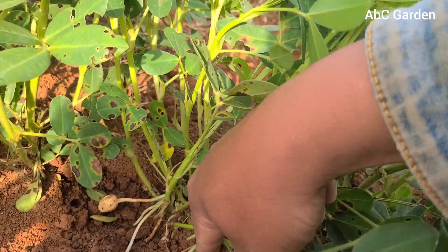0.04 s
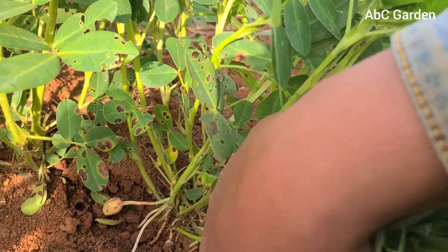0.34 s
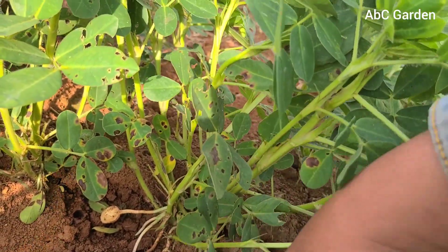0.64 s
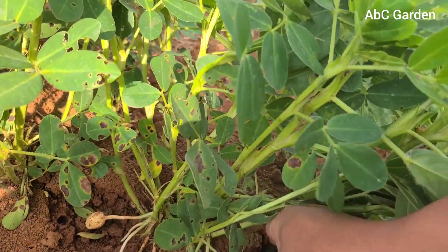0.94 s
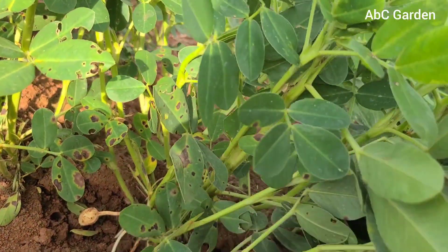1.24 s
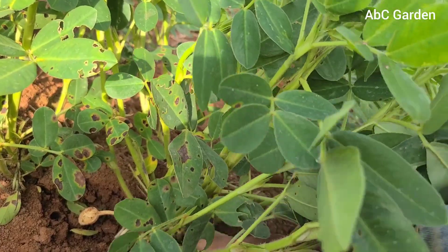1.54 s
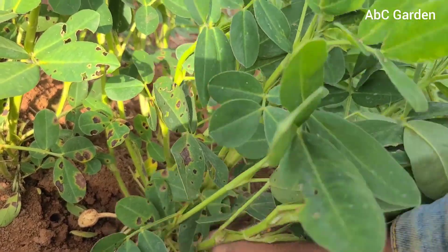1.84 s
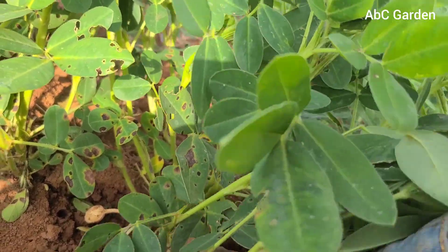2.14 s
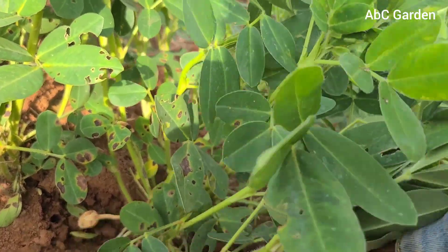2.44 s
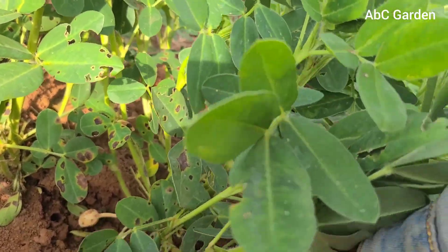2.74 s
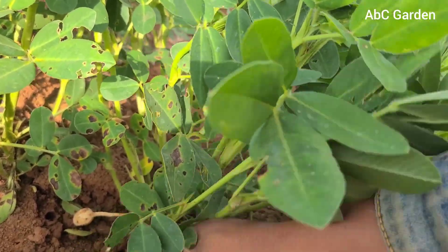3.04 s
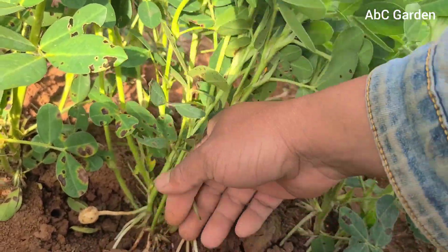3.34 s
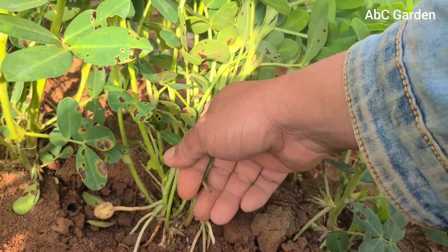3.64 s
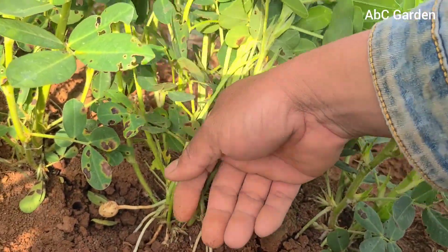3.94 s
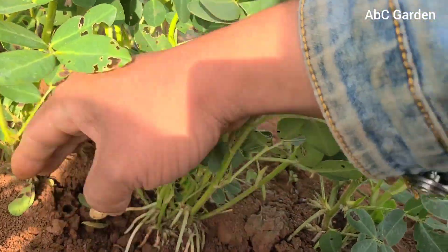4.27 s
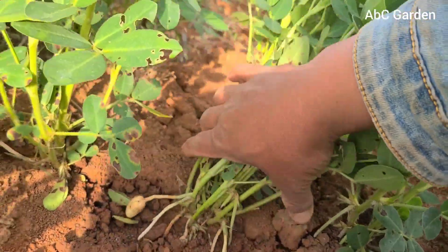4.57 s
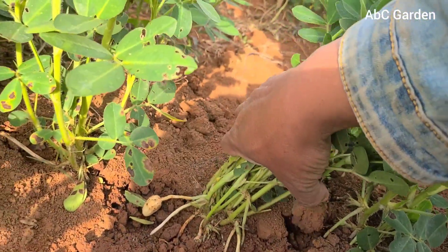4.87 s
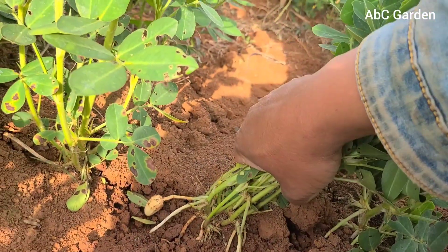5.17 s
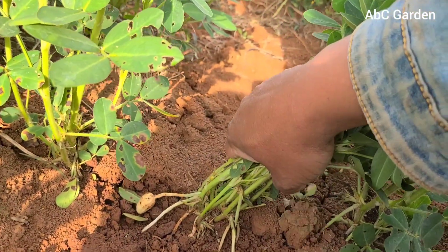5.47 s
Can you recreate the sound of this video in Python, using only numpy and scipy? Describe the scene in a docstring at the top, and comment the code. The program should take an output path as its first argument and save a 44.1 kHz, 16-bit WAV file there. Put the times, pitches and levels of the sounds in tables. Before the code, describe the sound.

Two far-off engines drone under the close, irregular rustle of a hand pulling at a plant in a garden. Cloth brushes by first and dry earth crunches, then leaves crinkle, a stalk snaps and the stems bump softly on the ground. After a short pause the scraping and snapping resume, while one engine throttles back and fades.

```python
"""A hand works into a leafy plant close to the microphones and drags its stems over dry soil.
First a sleeve brushes past and clods crunch; far off, one engine idles and another runs steadily.
Each stroke is a mass of tiny slips: ground scuffs, stems rasp, leaves sizzle. Around 2 s a leaf edge
crinkles, a stalk snaps and the gathered stems bump the ground. The hand rests near 3.8 s, then drags on
through more snaps and crunches while the running engine throttles back."""
import sys
import numpy as np
from scipy import signal
from scipy.fft import rfft, irfft, next_fast_len
from scipy.io import wavfile
from scipy.ndimage import uniform_filter1d

SR = 44100
rng = np.random.default_rng(int(sys.argv[2]) if len(sys.argv) > 2 else 0)


def wav_out(sig):
    """Save sig, one row per channel (or a flat mono array), as 16-bit PCM at SR to the path in sys.argv[1]."""
    wavfile.write(sys.argv[1], SR, np.round(np.clip(np.atleast_2d(sig).T, -1, 1) * 32767).astype(np.int16))


N = 247401


# hand strokes: peak_s, rise_s, fall_s, rasp_db, scuff_re_rasp_db, sizzle_re_rasp_db, left_right_db
STROKES = [(0.119, 0.0089, 0.023, -50.5, 8, 1.5, -4), (0.2, 0.024, 0.011, -64, 10, 1, -1),
           (0.342, 0.034, 0.018, -58, -9, 3, -4), (0.45, 0.066, 0.037, -77, 17, 17.5, -2),
           (0.77, 0.049, 0.021, -53.5, 7, 1, -1.5), (1.11, 0.049, 0.075, -57, 4.5, -12, 1),
           (1.17, 0.046, 0.031, -54, -2, 3.5, 1), (1.24, 0.033, 0.046, -54.5, 5.5, 1, 1),
           (1.53, 0.027, 0.044, -58.5, -1.5, -11, 0), (1.796, 0.027, 0.031, -50.5, -0.5, -1.5, 1),
           (1.895, 0.026, 0.044, -59, -5, 3.5, 1), (1.997, 0.024, 0.017, -56.5, -5, -5, 0),
           (2.17, 0.054, 0.028, -58.5, 2.5, -16, -1), (2.288, 0.0064, 0.053, -54, 0, -1.5, 1.5),
           (2.46, 0.13, 0.075, -63, -5, 2.5, 2), (2.86, 0.097, 0.045, -59.5, 2.5, -9, 1),
           (3.15, 0.079, 0.087, -58, 2.5, -4.5, 2.5), (3.34, 0.12, 0.08, -64.5, 6.5, 1, 2),
           (3.577, 0.042, 0.021, -53.5, 1, -4.5, .5), (3.94, 0.041, 0.03, -64, 6.5, -15, 1),
           (4.42, 0.087, 0.19, -59, 5, 3, 1.5), (4.8, 0.053, 0.089, -64, 8, -3, 0),
           (4.985, .02, 0.06, -64, 4.5, -1, -4), (5.38, .02, 0.023, -64.5, -7, -5, -1)]
# stirring between strokes: time_s, rasp_db
STIR = [(0, -68), (0.57, -68.5), (0.86, -63), (0.97, -69), (1.36, -64), (1.45, -70), (1.95, -67),
        (2.35, -70.5), (2.68, -73.5), (3.3, -67), (3.5, -76), (3.68, -79.5), (3.86, -81), (4.0, -64.5),
        (4.65, -68.5), (5.05, -66.5), (5.28, -76), (5.61, -78.5)]
STIR_SCUFF_DB, STIR_SIZZLE_DB = 4, 0  # re rasp

def handling():
    """Stereo gains of scuff, rasp and sizzle; stirring and strokes add in power."""
    stir = amp(follow(STIR)[0])
    power = (amp([STIR_SCUFF_DB, 0, STIR_SIZZLE_DB])[:, None, None] * stir) ** 2
    for peak_s, rise_s, fall_s, rasp_db, scuff_db, sizzle_db, lean_db in STROKES:
        shares = amp([scuff_db, 0, sizzle_db])[:, None, None] * pan(lean_db)
        power = power + (shares * swell(peak_s, rise_s, fall_s, rasp_db)) ** 2
    return np.sqrt(power)


# spectra of scuffed ground, rasping stems, leaf on leaf: freq_hz, gain_db
SCUFF = [(100, -12.5), (250, 1), (500, -3.5), (780, 1.5), (950, -0.5), (1300, 3.5), (1600, -4.5),
         (1950, -3.5), (2350, -11.5), (4000, -17), (16000, -40)]
RASP = [(700, -19), (1800, -11), (2500, -0.5), (3100, -0.5), (3800, -2), (4700, -2.5), (5400, -8),
        (6300, -7), (7500, -17), (9200, -8.5), (16000, -30.5)]
SIZZLE = [(1000, -24), (4000, -14.5), (6200, -6.5), (7600, -7.5), (9000, -1.5), (11000, -3), (13000, -3.5),
          (15500, -8), (16500, -4.5)]

def foliage():
    """The hand scuffs the ground coarsely, stems rasp, leaf blades slide with a fine grain."""
    scuff_gain, rasp_gain, sizzle_gain = handling()
    scuff = friction(slips_per_s=800, spread_db=3.2, grain_s=0.001, floor=0.6, clump_db=0.9)
    rasp = friction(slips_per_s=900, spread_db=3.1, grain_s=0.0007, floor=1, clump_db=0.9)
    sizzle = friction(slips_per_s=900, spread_db=3.4, grain_s=0.0005, floor=0.9, clump_db=1.1)
    scuff = colour(patches(scuff, depth_db=2, width_bins=3, length_frames=10), SCUFF)
    rasp = colour(patches(rasp, depth_db=2, width_bins=4, length_frames=15), RASP)
    sizzle = colour(patches(sizzle, depth_db=1.5, width_bins=7, length_frames=10), SIZZLE)
    return scuff_gain * pan(-3.5) * scuff + rasp_gain * pan(-0.7) * rasp + sizzle_gain * pan(2) * sizzle


# stem on stem: start_s, level_db, pitch_hz
SCRATCHES = [(0.2127, -55, 3070), (0.76, -45.5, 4760), (0.891, -51.5, 3930), (1.791, -66, 2820),
             (2.293, -52, 4400), (2.4901, -55, 3300), (4.098, -54, 2760), (4.204, -57.5, 6000),
             (4.775, -55, 3420)]
# leaves flicking free: start_s, level_db
FLICKS = [(1.1674, -44.5), (1.786, -42.5), (1.8132, -42.5), (1.9884, -49), (1.998, -49), (2.532, -52.5),
          (2.845, -54.5), (3.5236, -53.5)]
# stalks and rootlets snapping: start_s, level_db, left_right_db
SNAPS = [(2.0327, -35, 5), (3.6565, -39.5, 4), (4.6244, -42, 5), (5.1392, -55, 0.5), (5.213, -47, 3),
         (5.4824, -52, 0.5), (5.505, -41.5, 2.0), (5.5528, -52, -2.5), (5.591, -48, -1.0)]
# snap spectrum: freq_hz, gain_db
SNAP_SPECTRUM = [(1000, -30), (4000, -8), (6000, -5), (8000, -7), (11000, 0), (14500, -10), (16500, 8)]

def catches():
    """Stems and leaves catch on each other and slip free; fine stalks break."""
    out = np.zeros((2, N))
    for start_s, db, hz in SCRATCHES:
        resonance = [(hz / 4, -24), (hz * 0.85, -8), (hz, 0), (hz * 1.08, -7), (hz * 1.9, -22)]
        scratch = colour(burst(rise_s=0.00032, decay_s=0.0068), resonance)
        add(out, start_s, amp(db) * scratch)
    for start_s, db in FLICKS:
        flick = colour(burst(rise_s=0.001, decay_s=0.0069), SIZZLE, tilt_db_per_oct=4)
        add(out, start_s, amp(db) * pan(6) * flick)
    for start_s, db, lean_db in SNAPS:
        snap = colour(burst(rise_s=0.0001, decay_s=0.0023), SNAP_SPECTRUM)
        add(out, start_s, amp(db) * pan(lean_db) * snap)
    return out


# crunches under the fingers: start_s, level_db, left_right_db, tilt_db_per_oct
CLODS = [(0.104, -41.5, -8, -1), (0.118, -36, -3, 2.5), (0.141, -46, -2, 7), (0.447, -47, -12, -3),
         (0.595, -51, -5, 2.5), (0.764, -39, 3, -3.5), (1.213, -41.5, 5, -6.5), (4.308, -52.5, -1, 4.5),
         (4.345, -54, -1, -5), (4.397, -49, 10, -1), (4.746, -45, -4, 1), (4.754, -46, -8, -0.5),
         (4.978, -52, 1, 2), (5.166, -50.5, -3, 3.5), (5.592, -48.5, 2, 3)]
# crunch spectrum: freq_hz, gain_db
CLOD_SPECTRUM = [(100, -2.5), (300, 2), (550, 8.5), (780, 5), (1000, -1.5), (1350, 1.5), (2000, -4.5),
                 (2500, -12.5), (3700, -14), (7000, -27), (16000, -43)]

def clods():
    """A dry clod gives way with one crack, then crumbles."""
    out = np.zeros((2, N))
    for start_s, db, lean_db, tilt in CLODS:
        crumble = burst(rise_s=0.0005, decay_s=0.0052)
        crack = 2 * signal.unit_impulse(crumble.shape[1], 25)
        add(out, start_s, amp(db) * pan(lean_db) * colour(crack + crumble, CLOD_SPECTRUM, tilt))
    return out


# bundle bumps: start_s, level_db
BUMPS = [(2.246, -52.5), (2.253, -45.5), (2.28, -48)]
# bundle modes: freq_hz, gain_db, t60_s
BUNDLE_MODES = [(422, 5.5, 0.022), (617, 3.5, 0.053), (760, -29, 0.03)]

def stem_bundle():
    """The gathered stems bump the ground and ring hollow."""
    out = np.zeros((2, N))
    t = np.arange(6000) / SR
    ring = sum(amp(db - 60 * t / t60_s) * np.sin(2 * np.pi * hz * t) for hz, db, t60_s in BUNDLE_MODES)
    for start_s, db in BUMPS:
        add(out, start_s, amp(db) * pan(-3.5) * ring)
    return out


# leaf-edge crinkles: peak_s, rise_s, fall_s, level_db
CRINKLES = [(1.805, 0.02, 0.017, -49), (1.9, .02, 0.06, -57.5), (2.002, 0.013, .012, -48.5),
            (2.032, .01, .016, -53), (2.46, 0.056, 0.074, -59)]
# crinkle spectrum: freq_hz, gain_db
CRINKLE_SPECTRUM = [(3000, -30), (8000, -38), (10000, -1), (12500, 5), (15500, 3), (16500, -12)]

def leaf_edge():
    """A leaf edge crinkles in sharp little slips beside the left microphone."""
    slips = friction(slips_per_s=500, spread_db=3.6, grain_s=0.0005, floor=0.15, clump_db=1.2)
    crinkle = colour(patches(slips, depth_db=1.5, width_bins=7, length_frames=6), CRINKLE_SPECTRUM)
    return sum(swell(*row) for row in CRINKLES) * pan(8) * crinkle


# sleeve drags: peak_s, rise_s, fall_s, level_db
DRAGS = [(0.12, 0.0061, .01, -54), (0.2, 0.029, .03, -62), (0.3, 0.062, 0.09, -55.5)]
# cloth spectrum: freq_hz, gain_db
CLOTH_SPECTRUM = [(400, -18), (1200, -1), (1850, 8), (2300, -2), (3000, 4.5), (3700, -8), (5000, -5),
                  (8000, -35), (16000, -35)]

def sleeve():
    """Cloth drags over stems on the right."""
    slips = friction(slips_per_s=1200, spread_db=2.5, grain_s=0.0006, floor=0.5, clump_db=0.6)
    return sum(swell(*row) for row in DRAGS) * pan(-10) * colour(slips, CLOTH_SPECTRUM)


# engine speed: time_s, firing_hz
SPEED = [(0, 57.5), (0.85, 57.7), (1.9, 59.3), (3.5, 60.1), (4.05, 59.4), (4.27, 55.5), (5.1, 50.5),
         (5.6, 46.6)]
# firing tone: time_s, level_db
THROB = [(0, -45), (0.5, -49), (0.75, -42), (1, -52.5), (1.25, -40.5), (1.5, -43), (1.9, -37),
         (2.35, -47.5), (2.75, -36.5), (3.15, -45), (4.12, -36.5), (4.2, -60), (4.8, -60)]
# engine load, drives overtones and gas: time_s, gain_db
LOAD = [(0, -1), (0.8, 1.5), (1.5, 3), (2.3, 0), (3.7, -1.5), (4.4, -4), (5.6, -12)]
# exhaust overtones: firing_multiple, level_db
EXHAUST = [(3, -66), (4, -67.5), (5, -74.5), (6, -75.5), (7, -80.5), (8, -73), (9, -74), (10, -75.5)]
# gas noise spectrum: freq_hz, gain_db
GAS_SPECTRUM = [(100, -10), (200, 0), (330, 0.5), (520, 2), (640, -4.5), (900, -16), (3000, -36),
                (16000, -68)]
OCTAVE_DB, GAS_DB = -49.5, -61  # at 0 dB load
ENGINES_LEAN_DB = -2.03

def running_engine():
    """A distant exhaust: only the low orders and a soft flutter of gas carry this far."""
    (firing_hz,), (firing_db,), (load_db,) = follow(SPEED), follow(THROB), follow(LOAD)
    cycles = np.cumsum(firing_hz) / SR + 0.0086 * drift(rate_hz=7)
    firing = amp(firing_db) * tone(cycles)
    octave = amp(OCTAVE_DB + 1.62 * load_db) * tone(2 * cycles)
    overtones = sum(amp(db + load_db + 3.1 * drift(rate_hz=1.45)) * tone(k * cycles) for k, db in EXHAUST)
    puffs = noise(N) * (1 + 0.37 * tone(cycles))
    gas = amp(GAS_DB + load_db) * unit(colour(puffs, GAS_SPECTRUM))
    return (firing + octave + overtones) * pan(ENGINES_LEAN_DB) + gas


# idle harmonics: beat_multiple, level_db
IDLE_HARMONICS = [(2, -71), (3, -70), (4, -53), (5, -49.5), (6, -49.5), (7, -69), (8, -65.5)]
IDLE_BEAT_HZ = 12.13

def idling_engine():
    """A second distant exhaust hums on wavering harmonics of its slow beat."""
    cycles = IDLE_BEAT_HZ * np.arange(N) / SR + 0.005 * drift(rate_hz=0.59)
    hum = sum(amp(db) * tone(k * cycles) for k, db in IDLE_HARMONICS)
    return amp(drift(rate_hz=3.3) - 2.5) * pan(ENGINES_LEAN_DB) * hum


# open-air spectrum: freq_hz, gain_db
AIR_SPECTRUM = [(20, -25.5), (45, 5.5), (70, 5.5), (110, 0), (200, -9), (480, -18), (850, -30.5),
                (1300, -23.5), (2200, -30.5), (3300, -30), (7500, -53.5), (9000, -63), (16000, -48)]
AIR_DB = -50

def air():
    """Outdoor rumble with a faint hiss."""
    return amp(AIR_DB + 0.23 * drift(rate_hz=3.9)) * unit(colour(noise(N), AIR_SPECTRUM))


# microphone likeness: freq_hz, correlation (clipped to 1)
MIC_LIKENESS = [(60, 1.3), (110, 0.5), (200, 0.9), (380, 0.57), (700, 0.15), (1290, 0.24), (2400, -0.02),
                (15000, 0.0)]
# microphone balance: freq_hz, left_right_db
MIC_BALANCE = [(100, 2), (300, -0.5), (600, -3.5), (1300, 1), (2500, 1), (15000, -1)]

def noise(size):
    """White noise at two microphones: alike in the bass, unrelated in the treble."""
    padded = next_fast_len(size)
    hz = np.fft.rfftfreq(padded, 1 / SR)
    left, unrelated = rfft(rng.standard_normal((2, padded)))
    likeness = np.clip(read(MIC_LIKENESS, hz), -1, 1)
    right = likeness * left + np.sqrt(1 - likeness ** 2) * unrelated
    return irfft(np.array([left, right]) * pan(read(MIC_BALANCE, hz)), padded)[:, :size]


def friction(slips_per_s, spread_db, grain_s, floor, clump_db):
    """Tiny slips over a steady power floor, each a dying puff; a few are large, and they clump."""
    slipping = rng.random(N) < slips_per_s / SR
    slips = slipping * amp(spread_db * np.minimum(rng.exponential(1, N), 4.5))
    power = signal.lfilter([1], [1, -np.exp(-1 / (grain_s * SR))], slips ** 2)
    envelope = np.sqrt(power / power.mean() + floor)
    return unit(noise(N) * envelope * amp(clump_db * drift(rate_hz=77)))


def patches(x, depth_db, width_bins, length_frames):
    """Each leaf or stalk that takes over the rubbing has its own pitch: short patches of colour."""
    spectra = signal.stft(x, nperseg=256, noverlap=192)[2]
    field = rng.standard_normal(spectra.shape[1:])
    for _ in range(2):
        field = uniform_filter1d(field, width_bins, axis=0)
        field = uniform_filter1d(field, length_frames, axis=1)
    patchy = signal.istft(spectra * amp(depth_db * unit(field)), nperseg=256, noverlap=192)[1]
    return unit(patchy[:, :N])


def burst(rise_s, decay_s, size=6000):
    """A noise puff with the energy of its envelope scaled to peak 1."""
    t = np.arange(size) / SR
    envelope = (1 - np.exp(-t / rise_s)) * np.exp(-t / decay_s)
    return unit(noise(size) * envelope) * np.sqrt(np.mean(envelope ** 2)) / envelope.max()


def swell(peak_s, rise_s, fall_s, db):
    """Gain of one stroke: exponential rise and fall."""
    t = np.arange(N) / SR - peak_s
    away = np.maximum(-t / (rise_s + 1e-4), t / (fall_s + 1e-4))
    return amp(db) * np.exp(-np.minimum(away, 20))


def colour(x, spectrum, tilt_db_per_oct=0, size=4096):
    """Minimum-phase filter of unit energy."""
    hz = abs(np.fft.fftfreq(size, 1 / SR))
    log_gain = np.log(amp(read(spectrum, hz) + tilt_db_per_oct * np.log2(hz / 1000 + 0.1)))
    response = np.exp(np.conj(signal.hilbert(log_gain)))
    taps = np.fft.ifft(response).real[:size // 2]
    return signal.oaconvolve(x, taps[None] / np.linalg.norm(taps), axes=1)[:, :x.shape[1]]


def drift(rate_hz, size=4096):
    """Slow random wander, rms 1."""
    hz = np.fft.rfftfreq(size, N / SR / size)
    slow = irfft(rfft(rng.standard_normal(size)) / (1 + (hz / rate_hz) ** 2))
    return unit(np.interp(np.linspace(0, size - 1, N), np.arange(size), slow))


def tone(cycles):
    """Sinusoid of rms 1, random start phase."""
    return np.sqrt(2) * np.cos(2 * np.pi * (cycles + rng.random()))


def amp(db):
    """Decibels to gain."""
    return 10 ** (np.asarray(db) / 20)


def unit(x):
    """Scales to rms 1."""
    return x / np.sqrt(np.mean(x ** 2) + 1e-20)


def read(spectrum, hz):
    """Interpolates on a log-frequency axis."""
    knots_hz, values = np.transpose(spectrum)
    return np.interp(np.log(hz + 1), np.log(knots_hz + 1), values)


def follow(rows):
    """Value columns of a time table, per sample."""
    time_s, *columns = np.transpose(rows)
    return [np.interp(np.arange(N) / SR, time_s, column) for column in columns]


def add(mix, start_s, sound):
    """Mixes in a stereo sound."""
    part = mix[:, round(start_s * SR):][:, :sound.shape[1]]
    part += sound[:, :part.shape[1]]


def pan(lean_db):
    """Constant-power stereo gains; positive is left."""
    gains = amp(np.array([lean_db, -lean_db]).reshape(2, -1) / 2)
    return gains / np.sqrt(np.mean(gains ** 2, 0))


def scene():
    """The plant close by, the engines far off."""
    close = foliage() + catches() + clods() + stem_bundle() + leaf_edge() + sleeve()
    return close + running_engine() + idling_engine() + air()


def record(dry, cutoff_hz=15950):
    """The recorder's band limit."""
    lowpass = signal.firwin(511, cutoff_hz, window=("kaiser", 9), fs=SR)
    return signal.oaconvolve(dry, lowpass[None], "same")


dry = scene()
out = record(dry)
wav_out(out)
```